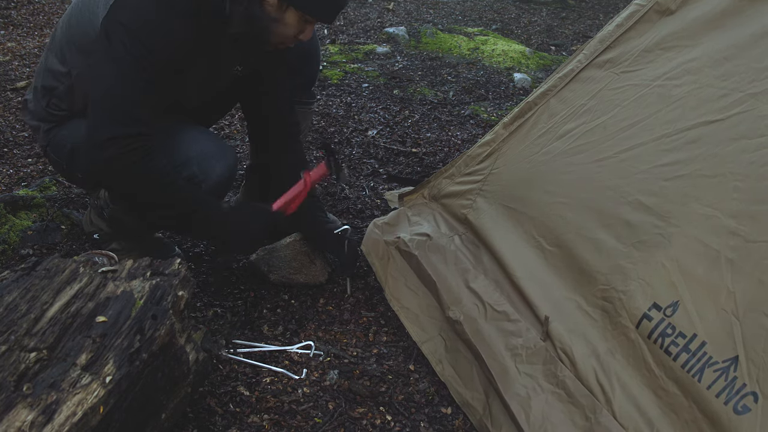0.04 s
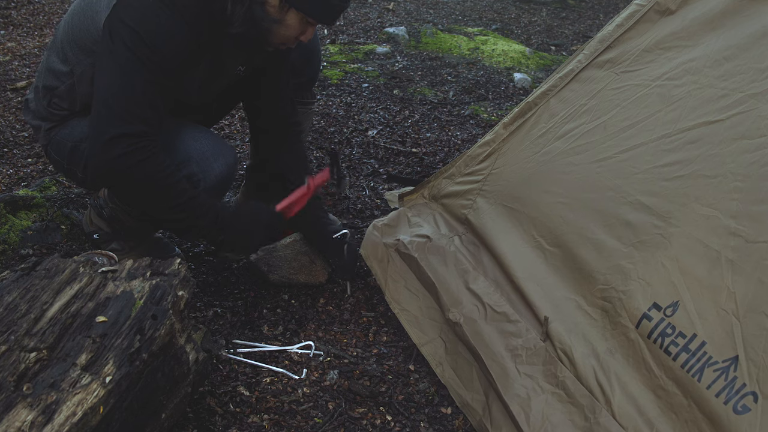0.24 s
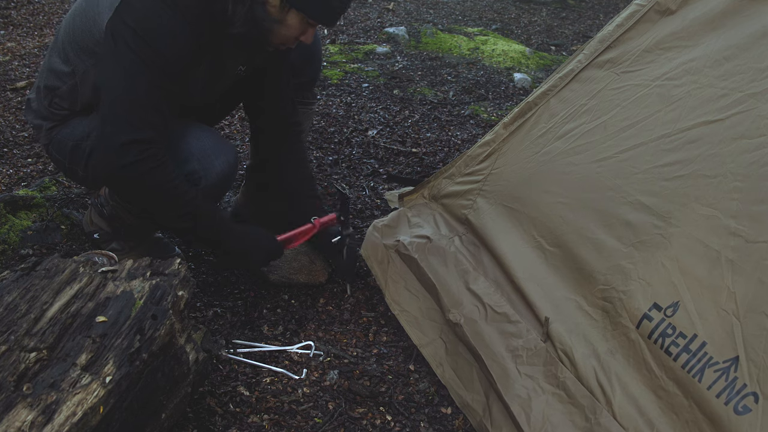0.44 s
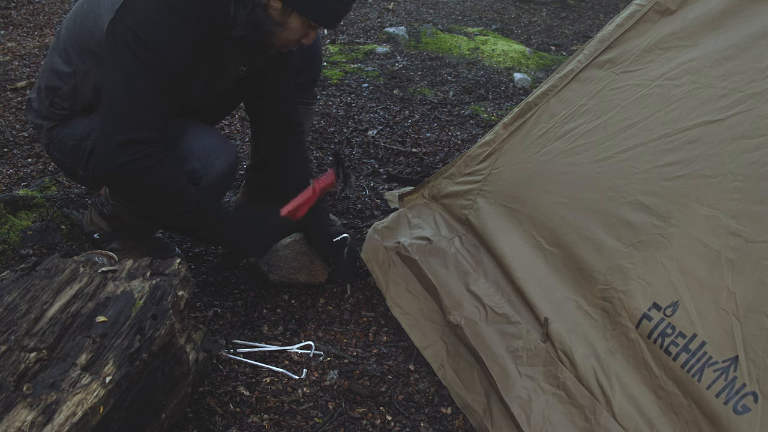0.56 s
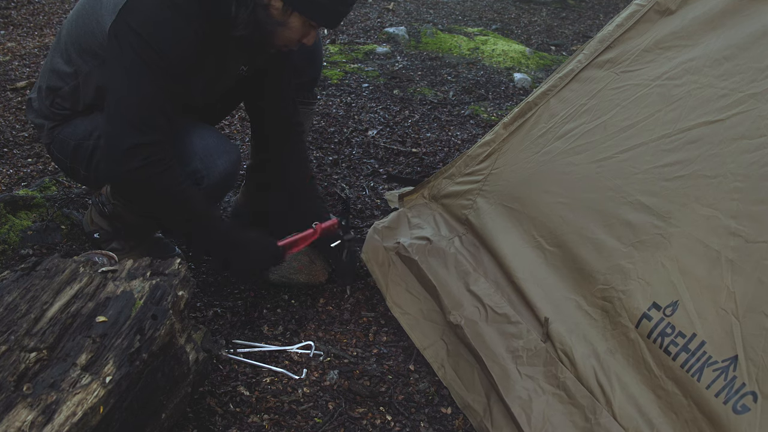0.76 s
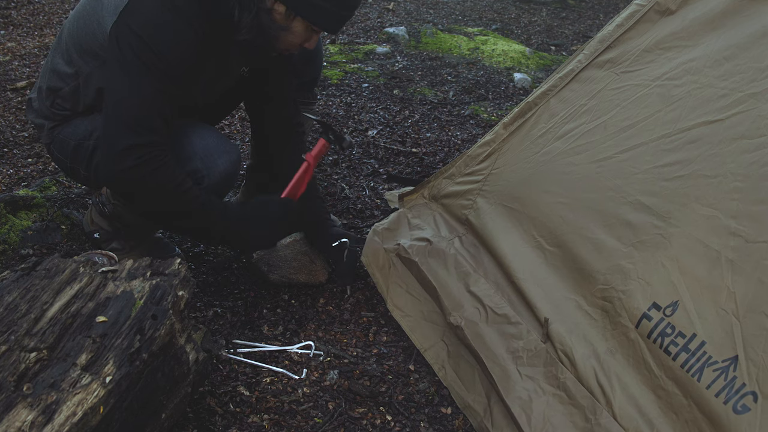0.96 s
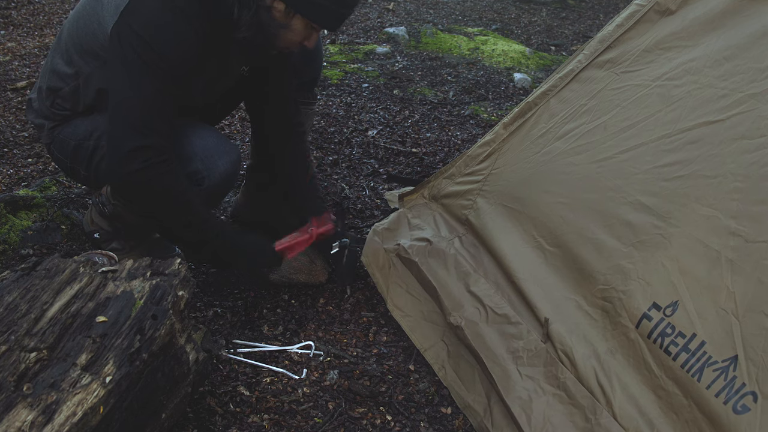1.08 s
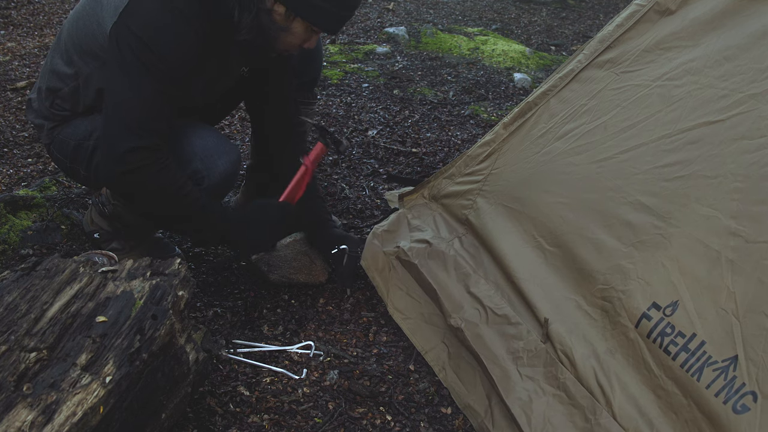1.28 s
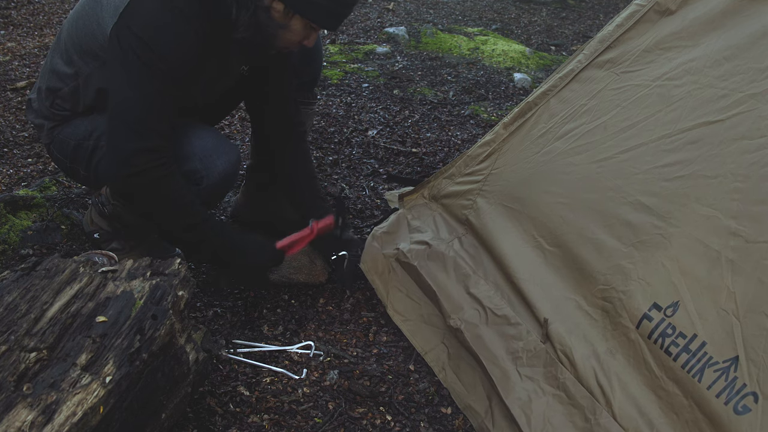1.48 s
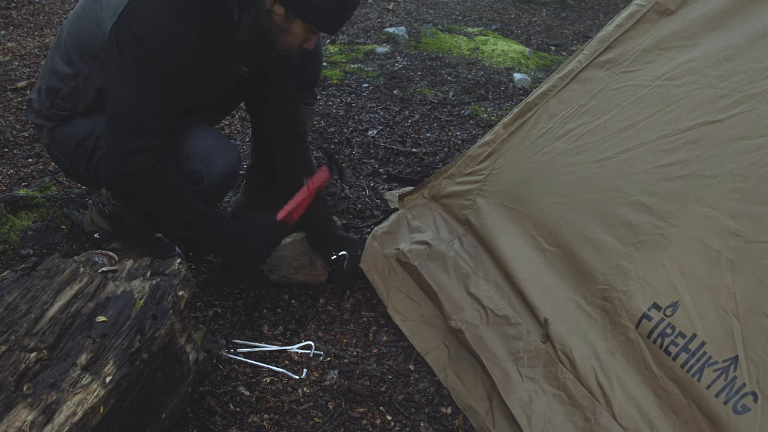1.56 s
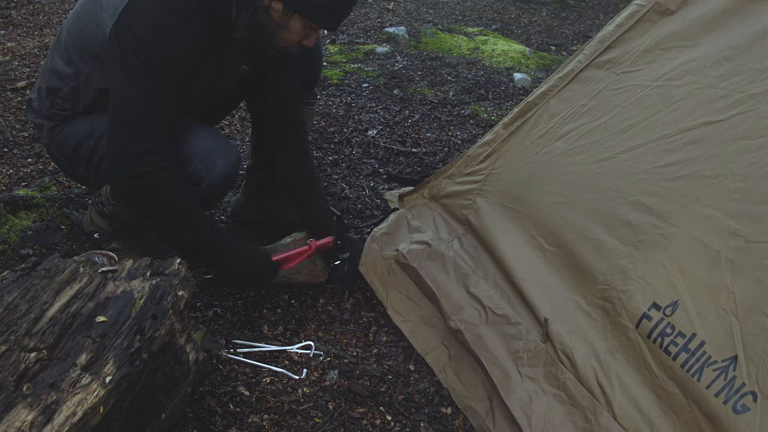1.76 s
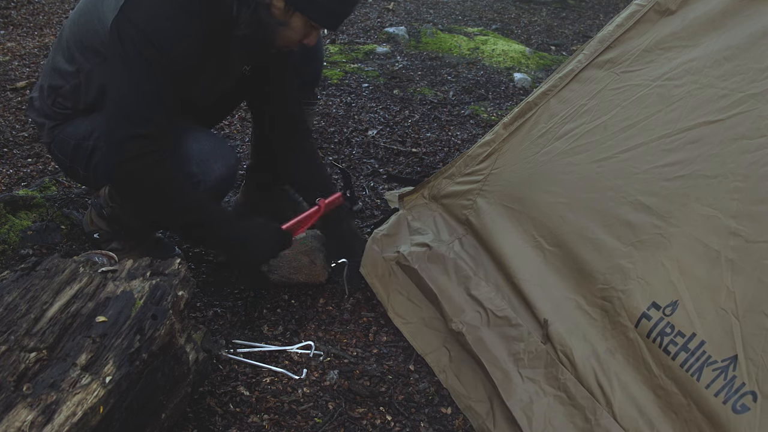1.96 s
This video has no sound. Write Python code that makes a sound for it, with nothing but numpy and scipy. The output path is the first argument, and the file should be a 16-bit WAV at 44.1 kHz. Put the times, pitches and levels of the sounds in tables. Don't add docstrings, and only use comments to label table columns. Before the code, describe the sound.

A steel hammer drives a thin metal tent stake into soil with six even blows, each a crisp crack and short bright ring, close to a small stereo microphone in a quiet forest, fading at the end.

```python
import sys
import numpy as np
from scipy import signal
from scipy.fft import rfft, irfft, next_fast_len
from scipy.io import wavfile
from scipy.ndimage import uniform_filter1d

SR = 44100
rng = np.random.default_rng(int(sys.argv[2]) if len(sys.argv) > 2 else 0)


def decibels_to_gain(level_db):
    exponent = np.asarray(level_db, float) / 20
    return 10 ** exponent


def unload_wav(signal):
    wavfile.write(
        sys.argv[1],
        SR,
        np.round(np.clip(np.atleast_2d(signal).T, -1, 1) * 32767).astype(np.int16),
    )


N = 89214
PORTS = np.array([[.5], [-.5]])


def evened(x):
    return x / np.sqrt(np.mean(x ** 2) + 1e-20)


def read(points, hz):
    f, value = np.transpose(points)
    return np.interp(np.log(hz + 1), np.log(f + 1), value)


def add(mix, s, sound):
    part = mix[..., round(s * SR):][..., :sound.shape[-1]]
    part += sound[..., :part.shape[-1]]


def mode(hz, db, t60, delay=0., rise=0., lead=0.):
    t = np.arange(SR // 4) / SR - delay
    since_start = np.maximum(t - max(-delay, 0), 0)
    decay = decibels_to_gain(db - 60 * since_start / t60)
    swell = 1 - np.exp(-(since_start / (rise + 1 / SR)) ** 2)
    return decay * swell * np.sin(2 * np.pi * hz * t + lead)


def burst(t60, channels=1):
    t = np.arange(SR // 4) / SR
    return rng.standard_normal((channels, len(t))) * decibels_to_gain(-60 * t / t60)


def coloured(x, gain):
    size = next_fast_len(2 * x.shape[-1])
    spectrum = rfft(x, size) * gain(np.fft.rfftfreq(size, 1 / SR))
    return irfft(spectrum, size)[..., :x.shape[-1]]


# (f/Hz, level/dB per Hz)
HUSH = [(22, -35.5), (55, 3.5), (410, -4.5), (1720, -16.5), (3000, -27), (7000, -27), (15500, -27.5),
        (15900, -69)]
# (f/Hz, likeness -1 to 1)
LIKENESS = [(60, 0.99), (180, 0.98), (550, 0.52), (1650, -0.25), (4970, 0.56), (15000, 1)]
HUSH_DB, PATCHY_DB, SWELL_DB = -64.5, 1.5, .4
WHINE_HZ, WHINE_DB = 13350, -91


def hush():
    frames, hz = N // 256 + 5, np.fft.rfftfreq(1024, 1 / SR)
    a, b, c, d, patches = rng.standard_normal((frames, 513, 5)).T
    swell = evened(uniform_filter1d(patches[0], size=40))
    patches = uniform_filter1d(patches, size=12, axis=0)
    patches = evened(uniform_filter1d(patches, size=14, axis=1))

    same = np.clip(read(LIKENESS, hz), -1, 1)[:, None]
    left = a + 1j * b
    right = same * left + np.sqrt(1 - same ** 2) * (c + 1j * d)
    level_db = read(HUSH, hz)[:, None] + PATCHY_DB * patches + SWELL_DB * swell
    air = signal.istft(np.array([left, right]) * decibels_to_gain(level_db), nperseg=1024, noverlap=768)[1][:, :N]

    port_phase = np.array([[0], [2]])
    whine = decibels_to_gain(WHINE_DB) * np.sin(2 * np.pi * WHINE_HZ * np.arange(N) / SR + port_phase)
    return decibels_to_gain(HUSH_DB) * evened(air) + whine


# (f/Hz, t60/s)
TREES = [(500, 1.8), (2500, 0.59), (7000, 0.85), (15000, 0.4)]
TREES_DB, TREES_RISE_S, TREES_EDGE_HZ = -29.5, .03, 15800
NEAR_DB, NEAR_T60 = -23.5, .045


def forest(x):
    t = np.arange(SR) / SR
    hz, frame_s, z = signal.stft(rng.standard_normal((2, SR)), SR, nperseg=256)
    z = z * decibels_to_gain(-60 * frame_s / read(TREES, hz)[:, None])
    far = signal.istft(z, SR, nperseg=256)[1][:, :SR]
    far = far * (1 - np.exp(-(t / TREES_RISE_S) ** 2))
    near = rng.standard_normal((2, SR)) * decibels_to_gain(-60 * t / NEAR_T60)
    far = decibels_to_gain(TREES_DB) * far / np.linalg.norm(far[0])
    near = decibels_to_gain(NEAR_DB) * near / np.linalg.norm(near[0])
    tail = signal.fftconvolve(x, far + near, axes=1)[:, :N]
    return coloured(tail, lambda f: f < TREES_EDGE_HZ)


def grit(db, hz):
    noise = burst(0.031, channels=2)
    return decibels_to_gain(db) * coloured(noise, lambda f: np.exp(-(np.log((f + 1) / hz) / 0.39) ** 2))


# (f/Hz, level/dB, t60/s, delay/s, rise/s)
THUMP = [(135, 0, .075, .0017, .003), (64, -13, .1, -.004, .008), (235, -9, .04, .0022, .001),
         (420, -16, .03, .001, .001)]
# (f/Hz, level/dB, t60/s, delay/s, rise/s)
LATE = [(124, 1, .06, .0085, .009)]


def thump(thump_db, late_db, handle_db):
    first = decibels_to_gain(thump_db) * sum(mode(*row) for row in THUMP)
    late = decibels_to_gain(late_db) * sum(mode(*row) for row in LATE)
    handle = mode(748, handle_db, t60=.09, rise=.005)
    return first + late + handle


# (f/Hz, level/dB, t60/s, left minus right/dB)
SHANK = [(1550, -19, .015, .5), (2485, -14, .05, .1), (2725, -9, .065, 1.5), (7015, -6, .035, 9)]
# (f/Hz, level/dB, t60/s, left minus right/dB)
HOOK = [(4120, -1, .018, 2.5), (4420, -4, .02, 2.5), (5450, -8, .04, -2.5), (6290, -10, .04, 2.2)]
# (f/Hz, level/dB, t60/s, left minus right/dB)
HEAD = [(7695, -2, .045, -5), (7815, 0, .028, -5), (8290, -5, .04, -3), (8700, -4, .035, -1),
        (8860, -3, .035, 0)]
# (f/Hz, level/dB, t60/s, left minus right/dB)
FACE = [(9507, -3, .028, -1)]
# (f/Hz, level/dB, t60/s, left minus right/dB)
CLAW = [(10700, -5, .018, 0), (11800, -7, .01, 1), (12930, -9, .018, 1.5), (14830, -3, .035, 3),
        (15100, -5, .018, 2), (15720, -10, .035, 1.5)]
# (f/Hz, level/dB, t60/s, left minus right/dB)
NECK = [(2950, -3, .013, .5), (3265, -14, .08, 1), (3316, -4, .042, 2), (3520, -3, .014, 2)]
# (f/Hz, lead/rad)
LEFT_LEAD = [(1500, -.1), (3300, .6), (5450, .8), (6300, 2.1), (7700, -1.2), (8800, -3.3), (9500, -5.1),
             (15000, -4.3)]
CONTACT_S = 0.00023


def ring(rings_db):
    total = 0
    neck_db = 0
    for part, part_db in zip((SHANK, HOOK, HEAD, FACE, CLAW, NECK), (*rings_db, neck_db)):
        for hz, db, t60, pan_db in part:
            lead = rng.uniform(0, 2 * np.pi) + PORTS * read(LEFT_LEAD, hz)
            total = total + decibels_to_gain(PORTS * pan_db) * mode(hz, db + part_db, t60, rise=CONTACT_S, lead=lead)
    return total


# (f/Hz, level/dB)
CRACK = [(250, -39.5), (1200, -18.5), (1950, -18), (2600, 1), (4300, -5.5), (7900, -3.5), (12000, -7.5),
         (16300, -10.5)]
CRACK_DB, CRACK_T60, CRACK_RISE_S = 10.5, 0.011, 0.00034
CRACK_LAG_S = .00004


def crack(hook_db):
    log_gain = np.log(decibels_to_gain(read(CRACK, abs(np.fft.fftfreq(512, 1 / SR)))))
    taps = np.fft.ifft(np.exp(np.conj(signal.hilbert(log_gain)))).real[:256]
    noise = burst(CRACK_T60)
    t = np.arange(noise.shape[1]) / SR
    snap = signal.lfilter(taps / np.linalg.norm(taps), 1, noise * (1 - np.exp(-t / CRACK_RISE_S)))
    at_ports = coloured(snap, lambda f: np.exp(2j * np.pi * f * (PORTS - .5) * CRACK_LAG_S))
    return decibels_to_gain(CRACK_DB + hook_db) * at_ports


KNOCK_DB, KNOCK_S = -14, .00028


def knock(hook_db):
    u = np.arange(SR // 4) / SR / KNOCK_S - 2
    return -decibels_to_gain(KNOCK_DB + hook_db) * (1 - 2 * u ** 2) * np.exp(-u ** 2)


GROUND_ECHO_S, GROUND_ECHO_DB = 0.0018, -6


def clang(force_db, rings_db):
    hook_db = .5 * rings_db[1]
    snap = crack(hook_db)
    direct = ring(rings_db) + snap + knock(hook_db)
    add(direct, GROUND_ECHO_S, decibels_to_gain(GROUND_ECHO_DB) * snap)
    return decibels_to_gain(force_db) * direct, decibels_to_gain(force_db) * snap


# (t/s, force level/dB, soil thump level/dB, late soil wave level/dB, handle level/dB)
BLOWS = [
    (0.1547, -20, -55.5, -31.5, -39),
    (0.4855, -22.5, -32.5, -73.5, -39.5),
    (0.8064, -21.5, -28, -55, -40),
    (1.1361, -22, -26.5, -32.5, -35),
    (1.4663, -20, -25, -43.5, -38.5),
    (1.7764, -21.5, -25.5, -37.5, -39),
]
# (shank, hook, head, face, claw level/dB)
RINGS = [
    (-9.5, -13.5, -3, -1, 3.2),
    (-9.9, 1, 2.4, 3.5, 5.5),
    (-4.4, 2.94, 4, -1.5, 1.8),
    (-7.6, 5.05, 1.5, 4, 7.5),
    (9.5, -1, 4.8, 8.5, -4.5),
    (4.5, 0.5, 3.5, 5.5, 0),
]
# (t/s, level/dB, f/Hz)
TICKS = [
    (1.6115, -57, 3200),
    (1.7557, -56, 9000),
    (1.7668, -57, 8500),
]
CRACK_TO_TREES_DB = -13


def scene():
    metal, cracks, low = np.zeros((3, 2, N))
    for (s, force_db, *low_db), rings_db in zip(BLOWS, RINGS):
        direct, snap = clang(force_db, rings_db)
        add(metal, s, direct)
        add(cracks, s, snap)
        add(low, s, thump(*low_db))
    for s, db, hz in TICKS:
        add(low, s, grit(db, hz))
    tail = forest(metal + decibels_to_gain(CRACK_TO_TREES_DB) * cracks)
    return metal + tail + low + hush()


def low_pass(x):
    return signal.sosfilt(signal.butter(12, 17140, fs=SR, output="sos"), x)


# (t/s, level/dB)
FADE = [(1.301, -1), (1.729, -5), (1.84, -5.5), (2.02, -14)]
TOP_EDGE_HZ = 16300


def record(dry):
    s, db = np.transpose(FADE)
    soft = signal.sosfilt(signal.butter(10, TOP_EDGE_HZ, fs=SR, output="sos"), dry)
    faded = soft * decibels_to_gain(np.interp(np.arange(N) / SR, s, db))
    return low_pass(faded)


dry = scene()
out = record(dry)
unload_wav(out)
```